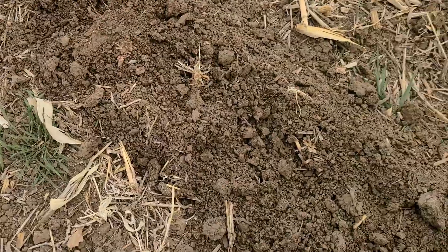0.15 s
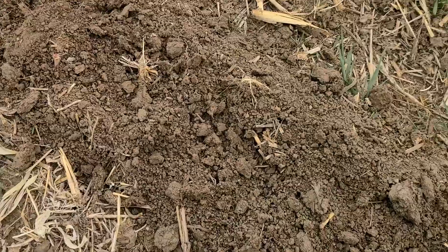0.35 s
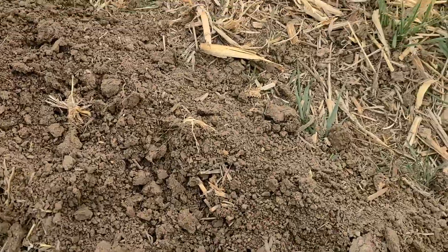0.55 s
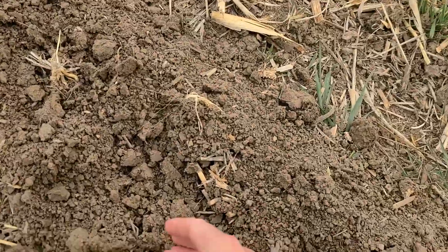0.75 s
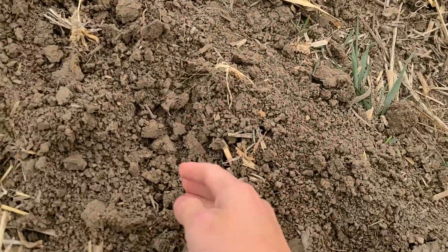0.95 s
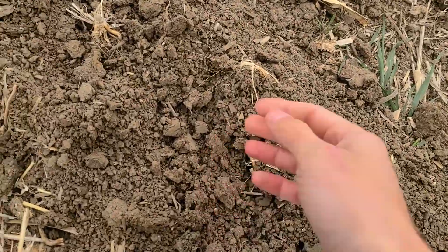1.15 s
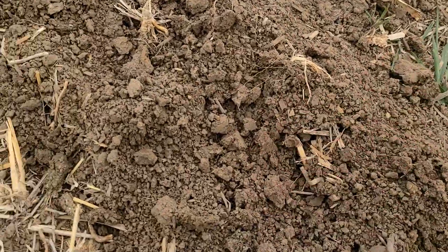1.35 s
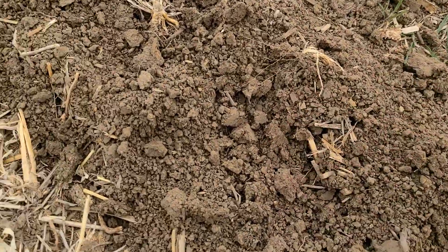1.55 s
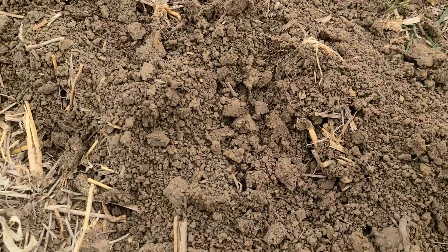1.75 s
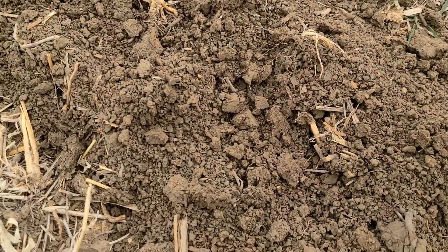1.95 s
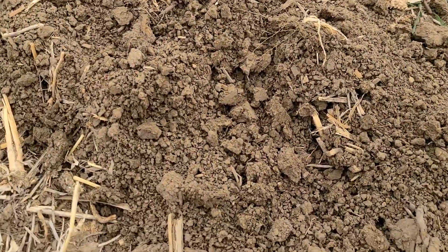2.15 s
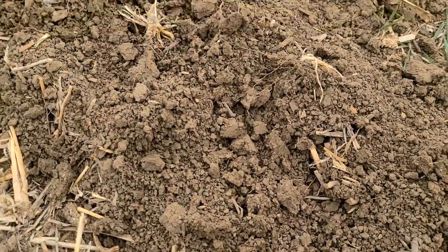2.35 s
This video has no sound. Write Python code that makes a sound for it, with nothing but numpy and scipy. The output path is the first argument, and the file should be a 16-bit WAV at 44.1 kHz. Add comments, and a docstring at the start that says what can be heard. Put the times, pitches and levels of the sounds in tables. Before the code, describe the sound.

Wind buffets a phone microphone held low over a bare field, a deep uneven rumble with hard thumps; a diesel machine idles steadily off to the right, and dry straw gives faint ticks and a brief rustle.

```python
"""A diesel machine idles far to the right of a phone held low over a bare field: sines for shaft orders, pump hum
and whines, resonant throbbing noise for the clatter; both reach the left port late.
Wind is coloured noise, partly separate at each port, plus hard buffets made of short damped swings.
Dry straw rustles as noise with sparse grains and ticks as resonant snaps. A steep filter cuts the top."""
import sys
import numpy as np
from scipy import signal
from scipy.fft import rfft, irfft
from scipy.io import wavfile
from scipy.ndimage import uniform_filter1d, map_coordinates

SR = 44100
rng = np.random.default_rng(int(sys.argv[2]) if len(sys.argv) > 2 else 0)


def store_pcm(level_fs):
    """Save levels as 16-bit WAV."""
    pcm = np.round(np.clip(level_fs, -1, 1) * 32767).astype(np.int16)
    wavfile.write(sys.argv[1], SR, np.atleast_2d(pcm).T)


N = 110161
T_S = np.arange(N) / SR

SHAFT_HZ, PORT_LAG_MS = 22.5, 0.5083
# left port's shading of the engine [f/Hz, gain/dB]
LEFT_SHADE = [(200, -2), (380, -3.5), (520, -4.5), (660, 1.5), (800, 2), (950, 0.5), (1250, -6),
              (1700, -1.5), (2050, -5), (2450, 1), (2950, -3), (4400, -1), (8000, -2.5)]


def undb(db):
    """dB to amplitude ratio."""
    return 10 ** (np.asarray(db) / 20)


def col(table, k):
    """Column k of a time table, interpolated to every sample."""
    a = np.array(table, float)
    return np.interp(T_S, a[:, 0], a[:, k])


def colour(x, points):
    """Shape the spectrum by [f/Hz, gain/dB] points, linear in dB over log frequency."""
    a = np.array(points, float)
    f_hz = np.maximum(np.fft.rfftfreq(N, 1 / SR), 1)
    gain_db = np.interp(np.log(f_hz), np.log(np.maximum(a[:, 0], 1)), a[:, 1])
    return irfft(rfft(x) * undb(gain_db), N)


def split(x, hz):
    """Lower and upper part, zero phase, summing to x."""
    low = signal.sosfiltfilt(signal.butter(4, hz, fs=SR, output="sos"), x)
    return low, x - low


def unit(x):
    """Scale to rms 1."""
    return x / np.sqrt(np.mean(x ** 2))


def pan(left_minus_right_db):
    """Left and right gains, half the difference each way."""
    return undb(np.array([left_minus_right_db, -left_minus_right_db]) / 2)


def noise(*shape):
    """White Gaussian noise of rms 1."""
    return rng.standard_normal(shape)


def walk(rate_hz):
    """Random levels held 1 / rate_hz and slewed twice; rms 1."""
    hold = int(SR / rate_hz)
    steps = np.repeat(noise(N // hold + 1), hold)
    return unit(uniform_filter1d(uniform_filter1d(steps, hold), hold)[:N])


def late(x, ms):
    """Delay by a fixed or time-varying lag."""
    return map_coordinates(x, [np.arange(N) - ms * SR / 1000], mode="mirror")


def tone(hz):
    """A steady sine of rms 1 at both ports, late at the left."""
    t_s = T_S - np.array([[PORT_LAG_MS / 1000], [0]])
    return np.sqrt(2) * np.sin(2 * np.pi * (hz * t_s + rng.random()))


def drone():
    """Shaft orders, pump hum and whines as sines; main tones dip and swell by table, weaker ones waver at random."""
    pump_hz, whistle_hz = 95.2, 1725
    # main tones [t/s, shaft order 2/dB, shaft order 3/dB, pump hum/dB, left minus right/dB]
    levels = [(0.0, -55, -36, -25.5, 1), (0.08, -30, -33, -29.5, 4), (0.25, -36.5, -27, -23.5, -3.5),
              (0.49, -35, -34, -34, -5), (0.62, -31, -33, -26, 3), (0.69, -30, -29, -25.5, -2),
              (0.73, -40, -34, -21, 6), (0.78, -32, -26, -26, 0), (0.98, -28, -29, -24.5, -1.5),
              (1.07, -43, -39, -21, -5), (1.19, -29.5, -28, -27, 2), (1.37, -56, -43, -32, -2),
              (1.51, -34.5, -31, -28, 2), (1.63, -36, -38, -28.5, 1.5), (1.74, -28, -27, -26, 2),
              (1.86, -30, -27, -25, -2), (1.96, -33, -25, -26, -4.5), (2.05, -37.5, -35, -29, 4),
              (2.41, -28.5, -25, -23.5, -1.5), (2.49, -38, -30, -23.5, -9)]
    # weaker shaft orders [multiple of shaft rate, mean level/dB]
    weak_orders = [(4, -60), (5, -49), (8, -51.5), (9, -52.5), (38, -54.5), (54, -48), (74, -56)]
    # pump overtones [multiple of pump rate, level re hum/dB]
    pump_overtones = [(2, -21.5), (3, -48)]
    # gear whines [f/Hz, mean level/dB]
    whines = [(543, -56.5), (1329, -58), (1381, -62), (1596, -54), (1821, -57), (2047, -67), (2432, -62.5)]
    # whine that stands out early and fades [t/s, mean level/dB]
    whistle = [(0, -42.5), (.3, -48), (.5, -51), (1.2, -57), (2.5, -59)]

    orders = undb(col(levels, 1)) * tone(2 * SHAFT_HZ) + undb(col(levels, 2)) * tone(3 * SHAFT_HZ)
    hum = tone(pump_hz)
    for multiple, db in pump_overtones:
        hum = hum + undb(db) * tone(multiple * pump_hz)
    strong = (orders + undb(col(levels, 3)) * hum) * pan(col(levels, 4))

    weak = undb(col(whistle, 1) + 2.5 * walk(13)) * tone(whistle_hz)
    for multiple, db in weak_orders:
        weak = weak + undb(db + 4.8 * walk(6.12)) * tone(multiple * SHAFT_HZ)
    for hz, db in whines:
        weak = weak + undb(db + 3.9 * walk(12)) * tone(hz)
    return strong + [colour(weak[0], LEFT_SHADE), weak[1]]


def clatter():
    """Noise in the engine's resonances, throbbing with the firings; each range also wavers alone."""
    lag_split_hz, bass_hz, treble_hz = 1240, 910, 2320
    bass_db = -34.5  # bass follows no level table
    # engine noise [t/s, gain above bass/dB, extra treble gain/dB, lag of lower part at left port/ms]
    levels = [(0, -33.5, 3.5, 0.49), (.2, -33.5, 0.5, 0.58), (.33, -35, -3.5, 0.56), (.45, -36.5, 1, 0.72),
              (.7, -36, -1, 0.67), (.95, -36, -1.5, 0.7), (1.15, -33, -0.5, 0.65), (1.35, -37, 2.5, 0.54),
              (1.6, -36.5, 0, 0.47), (1.75, -38.5, 3.5, 0.46), (1.9, -35.5, -2, 0.51),
              (2.2, -37, 1.5, 0.47), (2.5, -34.5, -1.5, 0.62)]
    # engine resonances [f/Hz, gain/dB]
    block = [(80, -44), (150, -16), (250, -6.5), (350, -16.5), (500, 2), (650, -5), (860, -4.5),
             (1050, 0.5), (1250, 2), (1500, -1), (1720, -1), (1850, -4.5), (2000, -4.5), (2300, -9.5),
             (2780, -11), (2960, -3), (3090, -5), (3280, -7), (3550, -15), (5000, -21), (7000, -27.5),
             (10000, -30.5), (16000, -38)]
    # engine noise unrelated between ports [f/Hz, gain re common noise/dB]
    scatter = [(200, -4), (500, -17), (900, -13), (1500, -5.5), (2400, -4.5), (2950, -8.5), (3600, -4),
               (6000, -4)]

    turn = 2 * np.pi * SHAFT_HZ * T_S
    # throb at 3, 2 and 1/3 times the shaft rate
    throb = 1 + 0.098 * np.sin(3 * turn) + 0.11 * np.sin(2 * turn + 1) + 0.011 * np.sin(turn / 3)
    common, left_own, right_own = [unit(colour(throb * noise(N), block)) for _ in range(3)]
    low, high = split(common, lag_split_hz)
    left = late(low, col(levels, 3)) + late(high, PORT_LAG_MS)
    left = colour(left + colour(left_own, scatter), LEFT_SHADE)
    right = common + colour(right_own, scatter)

    body, treble = split(np.array([left, right]), treble_hz)
    bass, body = split(body, bass_hz)
    body = undb(1.0 * walk(18) + 0.84 * walk(59.7)) * body
    treble = undb(col(levels, 2) + 1.33 * walk(16)) * treble
    bass = undb(bass_db + 1.2 * walk(12.87)) * bass
    return undb(col(levels, 1)) * (body + treble) + bass


def wind():
    """Eddies thump the ports in quick flurries: coloured noise, partly each port's own."""
    band_low_hz, band_high_hz = 110, 350
    # gusts [t/s, level in the band above/dB, left minus right/dB]
    gusts = [(0.0, -31.5, -12), (0.06, -40, 2), (0.24, -32.5, -6), (0.27, -38, -1), (0.4, -33.5, -6),
             (0.42, -37, -7), (0.46, -40, -2), (0.49, -36, -2), (0.55, -43, -1.0), (0.58, -37.5, 2.5),
             (0.65, -37.5, -1), (0.71, -32, -5), (0.78, -34, -2), (0.92, -36.5, -3), (0.97, -33.5, -6),
             (1.02, -38, -3), (1.06, -32.5, -10), (1.1, -34.5, -2), (1.15, -33.5, -3.5), (1.19, -36, 0),
             (1.25, -35, -3), (1.31, -41.5, 5), (1.36, -36, -1), (1.4, -43.5, 0), (1.49, -40, 2),
             (1.52, -43, 1), (1.67, -39.5, 6), (1.71, -37, -2), (1.74, -33.5, -3.5), (1.85, -37.5, -1),
             (1.87, -32.5, -4), (1.91, -35.5, -6), (1.99, -30, -8.0), (2.02, -41.5, 8), (2.09, -37.5, 4),
             (2.21, -37, -3.5), (2.25, -36, -1), (2.41, -36.5, -7), (2.44, -33, -4), (2.5, -28, -10)]
    # wind spectrum [f/Hz, gain/dB]
    spectrum = [(15, -38), (25, -12), (32, -17), (45, -6), (65, -4.5), (100, -4.5), (160, -14), (250, -21),
                (400, -30.5), (800, -35), (2000, -89)]
    # wind common to both ports [f/Hz, gain re each port's own/dB]
    shared_gain = [(30, -0.5), (70, -2.5), (130, 0), (300, 3)]

    left, right, shared = [undb(1.0 * walk(12) + 2.4 * walk(35)) * noise(N) for _ in range(3)]
    shared = colour(shared, shared_gain)
    ports = colour(np.array([left + late(shared, PORT_LAG_MS), right + shared]), spectrum)
    below_top, _ = split(ports, band_high_hz)
    _, band = split(below_top, band_low_hz)
    return undb(col(gusts, 1)) * pan(col(gusts, 2)) * ports / np.std(band)


def thumps():
    """Each buffet pushes the ports in and lets them swing back, one port a little after the other."""
    half_length_cycles, lag_scale_ms = 0.66, 2.4  # half length to 1/e
    # hard buffets [t/s, peak/dB, f/Hz, left minus right/dB]
    buffets = [(.248, -20, 64.4, -6), (0.374, -25, 130, -8), (.72, -19.5, 94, -5), (0.737, -10.5, 53, -4.5),
               (1.068, -21, 109, -15), (1.36, -25.5, 150, -6), (1.875, -27, 130, -5),
               (1.904, -15.5, 69.5, -3), (1.978, -21, 99, -6), (2.299, -23, 70, 0), (2.486, -17, 80.5, -3)]

    out = np.zeros((2, N))
    for s, db, hz, pan_db in buffets:
        right_lag_s = rng.uniform(-1.1, 1) * lag_scale_ms / 1000
        cycles = (T_S - s - np.array([[0], [right_lag_s]])) * hz
        swing = np.exp(-(cycles / half_length_cycles) ** 2) * np.cos(2 * np.pi * cycles)
        out -= undb(db) * pan(pan_db)[:, None] * swing
    return out


def rustle():
    """A flickering hiss with sparse grains, unrelated at the ports; once the straw is pressed down."""
    grains_per_s, grain_mean_db, grain_top_db, grain_level_db = 700, 4, 14, -4  # level re hiss
    flicker_db = 1.2
    press_s, press_sigma_s, press_db, press_pan_db = 1.673, 0.04, -38.5, 3.2
    # rustle [t/s, level/dB, left minus right/dB]
    levels = [(0, -50, 2), (.1, -58, 2), (.25, -57, 0), (.4, -52.5, -2), (.45, -50, -3), (.52, -53, -1),
              (.7, -53, -9), (.8, -63, -4), (.9, -53.5, -8), (1, -58, -10), (1.25, -57, -3),
              (1.4, -59.5, -5), (1.5, -52.5, -3), (1.6, -49.5, -1), (1.655, -45, 4), (1.685, -40, 4),
              (1.72, -43.5, -1), (1.75, -45.5, -2), (1.775, -40.5, 1.5), (1.795, -44, 1), (1.815, -50, -3),
              (1.84, -62, -8), (2.1, -57, -8), (2.14, -49.5, -4), (2.18, -57, -3), (2.3, -61, 0),
              (2.36, -51, 0), (2.4, -54, -2), (2.5, -53, -9)]
    # straw spectrum [f/Hz, gain/dB]
    straw = [(800, -41), (2000, 6.5), (4000, 11), (6000, 3.5), (8000, -0.5), (12000, 4.5), (16000, -4.5)]
    # brighter straw at the left port [f/Hz, gain/dB]
    left_bright = [(5000, 1), (9000, 1), (13000, 3.5)]
    # low body of the pressed straw [f/Hz, gain/dB]
    press_spectrum = [(150, -9), (300, 8.5), (900, 1.5), (2500, -10), (5000, -23)]

    size_db = np.minimum(grain_mean_db * rng.exponential(size=(2, N)), grain_top_db)
    hits = rng.random((2, N)) < grains_per_s / SR
    grains = hits * undb(size_db) * np.sign(noise(2, N))
    flicker = undb(1.0 * walk(59.9) + flicker_db * np.array([walk(40.05), walk(40.2)]))
    hiss = flicker * (noise(2, N) + undb(grain_level_db) * unit(grains))

    swell = np.exp(-.5 * ((T_S - press_s) / press_sigma_s) ** 2)
    press = undb(press_db) * pan(press_pan_db)[:, None] * swell * unit(colour(hiss, press_spectrum))
    dry_straw = unit(colour(np.array([colour(hiss[0], left_bright), hiss[1]]), straw))
    return undb(col(levels, 1)) * pan(col(levels, 2)) * dry_straw + press


def ticks():
    """Each straw tick: a snap and a very short crackle through a broad resonance, applied twice."""
    decay_ms, q, snap = .3, .8, 2.5  # snap re crackle rms at onset
    # straw ticks [t/s, peak/dB, f/Hz, left minus right/dB]
    tick_list = [(.082, -26, 11800, 9), (.1565, -30, 3600, 2), (0.4867, -23.5, 4540, 9),
                 (1.259, -22, 7600, 0.5), (1.563, -39, 5000, 6), (1.656, -37, 14500, 5),
                 (1.667, -34, 5000, 5), (1.675, -33, 11500, 5), (1.684, -30, 5500, 7),
                 (1.766, -21, 11500, 9), (1.771, -37, 6500, 4), (1.776, -26, 13500, 5),
                 (1.788, -28, 15000, 2), (1.791, -28, 11000, -3), (2.2105, -30.5, 8000, 2),
                 (2.3, -40, 6000, 0), (2.3544, -21.5, 8500, 9)]

    out, t_s = np.zeros((2, N)), np.arange(200) / SR
    for s, db, hz, pan_db in tick_list:
        push = noise(2, len(t_s)) * np.exp(-t_s * 1000 / decay_ms) + snap * (t_s == 0)
        b, a = signal.iirpeak(hz, q, SR)
        y = signal.lfilter(b, a, signal.lfilter(b, a, push))
        y = y / np.abs(y).max(axis=1, keepdims=True)
        i = int(s * SR)
        out[:, i:i + len(t_s)] += undb(db) * pan(pan_db)[:, None] * y
    return out


def scene():
    """Sum of machine, wind and straw."""
    return drone() + clatter() + wind() + thumps() + rustle() + ticks()


def record(dry):
    """The phone cuts the top: steep elliptic low-pass."""
    top_hz = 15900
    return signal.sosfilt(signal.ellip(10, .2, 80, top_hz, fs=SR, output="sos"), dry)


dry = scene()
out = record(dry)
store_pcm(out)
```